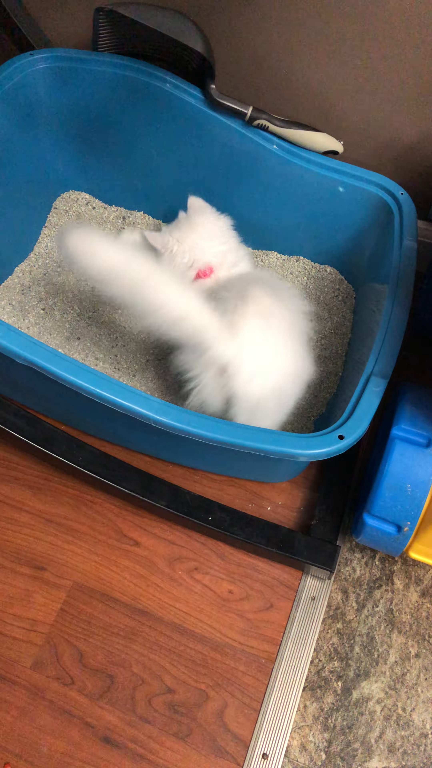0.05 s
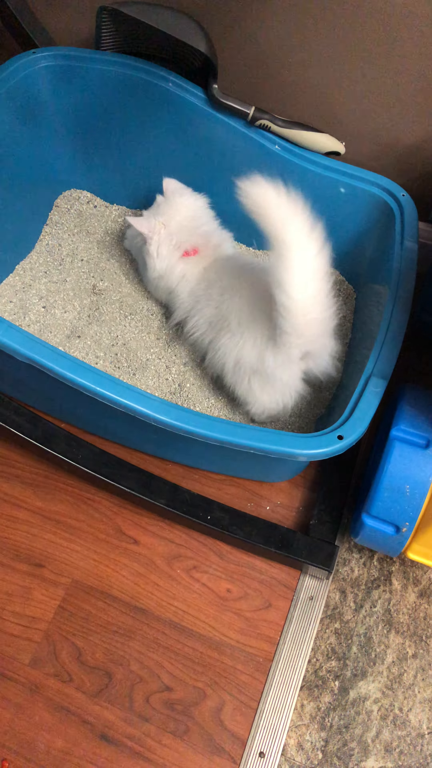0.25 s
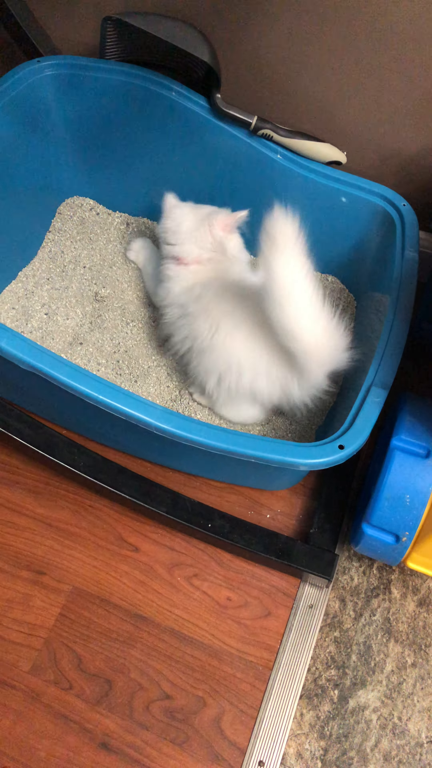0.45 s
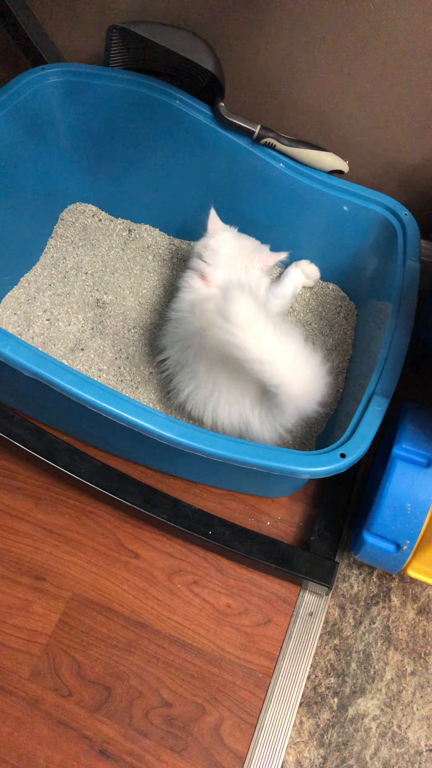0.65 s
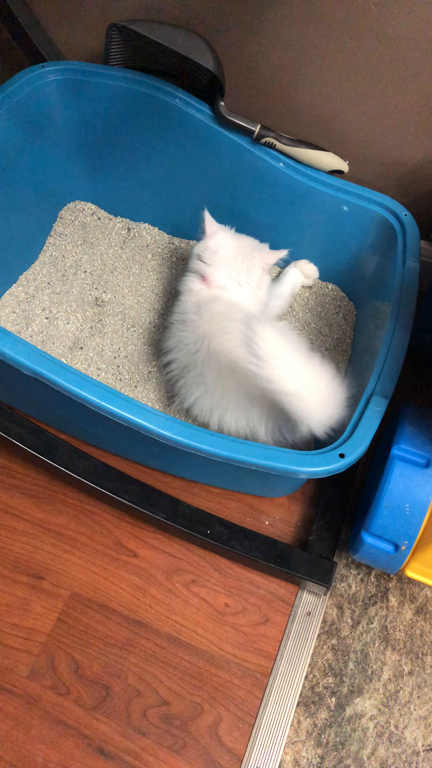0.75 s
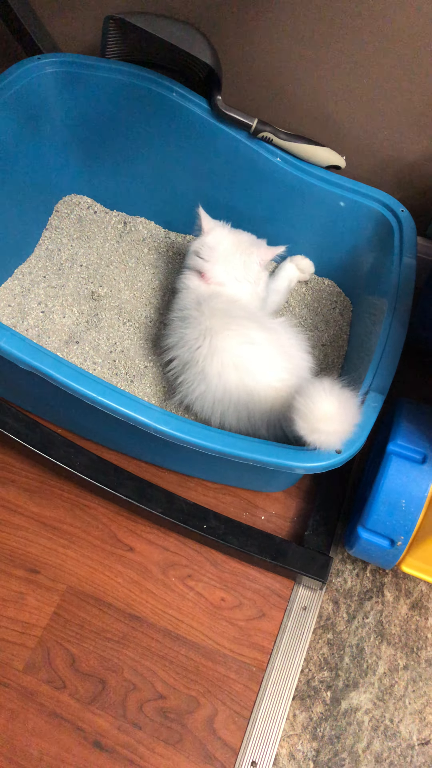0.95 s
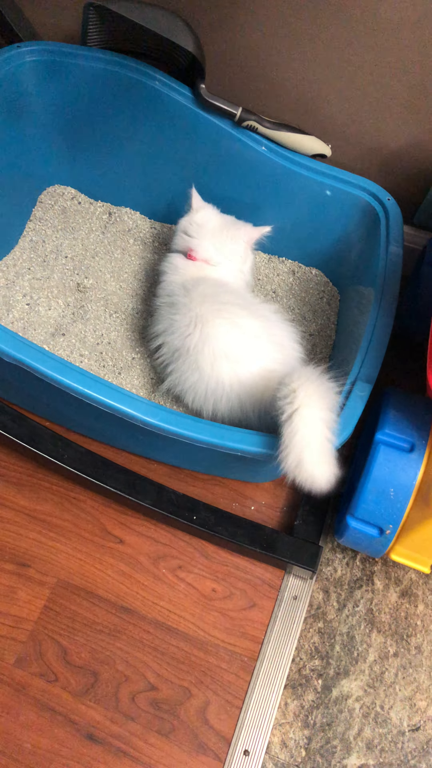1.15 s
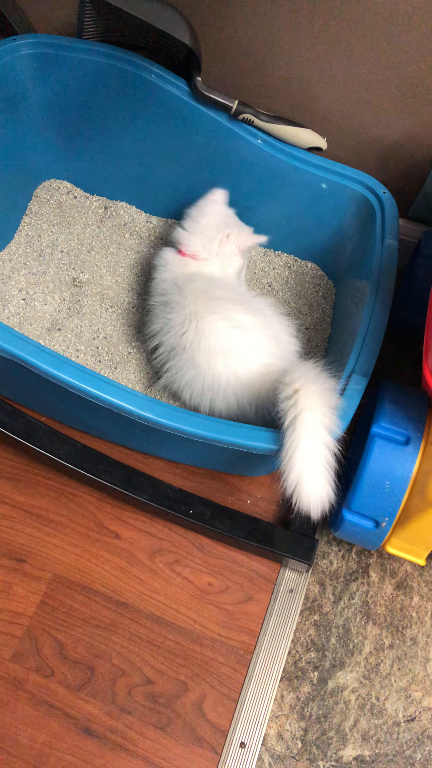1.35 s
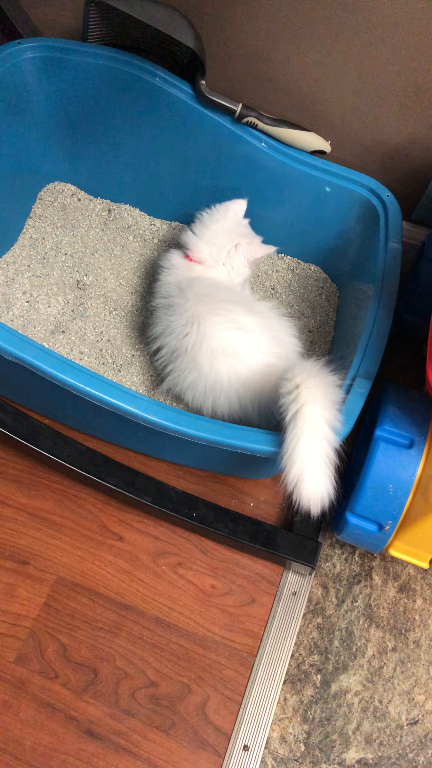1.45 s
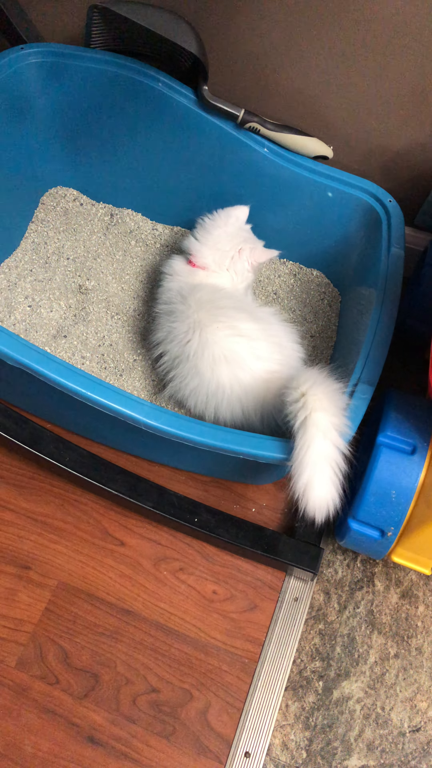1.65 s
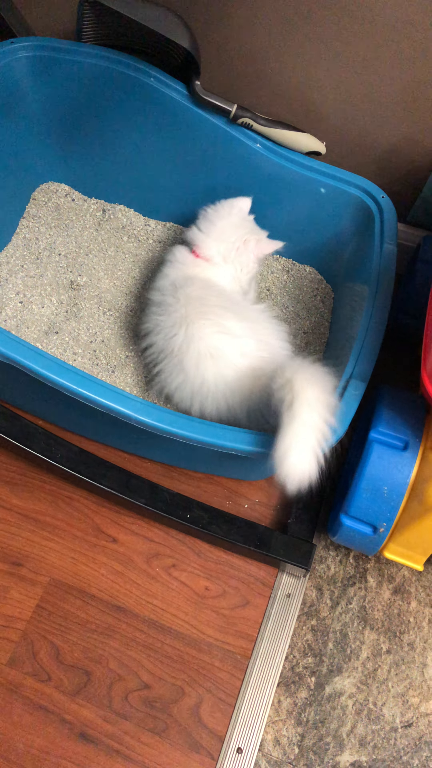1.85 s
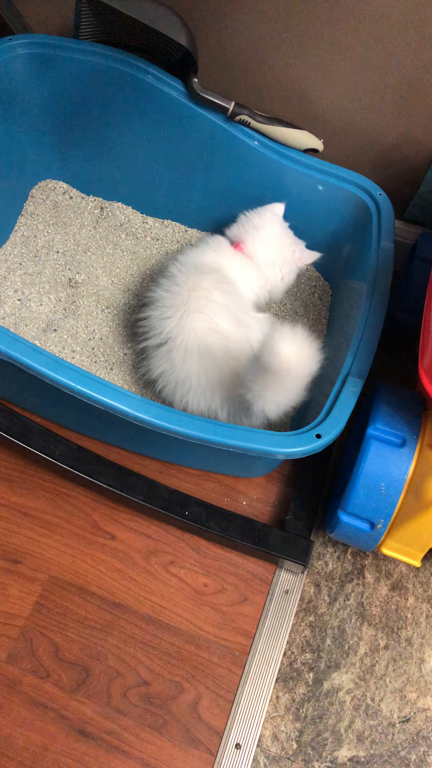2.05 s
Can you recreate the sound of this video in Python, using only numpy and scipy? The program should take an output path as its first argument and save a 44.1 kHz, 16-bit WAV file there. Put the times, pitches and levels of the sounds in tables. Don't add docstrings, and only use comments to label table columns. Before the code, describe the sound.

A kitten scrambles in a plastic litter tray, heard very close in a small quiet room. After a soft scrape, granules spray and clatter brightly from 0.2 to 0.4 seconds. A duller drag leads to a second hollow, rattling burst at 0.6 to 0.7. Then faint grit and fur rustle, with soft bumps near 0.85, 1.7 and 2.03, a light tap at 1.13, and low appliance hum.

```python
import sys
import numpy as np
from scipy import signal
from scipy.fft import rfft, irfft
from scipy.io import wavfile
from scipy.ndimage import uniform_filter1d

SR = 44100
rng = np.random.default_rng(int(sys.argv[2]) if len(sys.argv) > 2 else 0)


def gain_from_db(level_db):
    decades = np.asarray(level_db, float) / 20
    return 10 ** decades


def store_wav(level_fs):
    pcm = np.round(np.clip(np.atleast_2d(level_fs), -1, 1) * 32767)
    wavfile.write(sys.argv[1], SR, pcm.T.astype(np.int16))


N = 92610

# pitch_hz, level_db (per Hz)
ROOM_NOISE = [(15, -104), (25, -1.5), (114, -4.5), (229, -5.5), (335, -4.5), (863, -17), (3340, -31),
              (4370, -30.5), (16000, -49.5)]
# pitch_hz, level_db, waver_hz
HUM = [
    (57.2, -62, 7.3),
    (120.74, -57, 4.3),
    (184.3, -63.5, 2.9),
    (324.2, -62.5, 20.2),
    (437, -78, 25),
]
# start_s, length_s, level_db, pitch_hz
THUDS = [
    (0.823, 0.053, -52, 223),
    (0.856, 0.05, -49, 81),
    (1.668, 0.24, -53, 72),
    (1.68, 0.058, -47, 108.7),
    (2.031, 0.065, -52, 62),
]
# start_s, length_s, level_db, pitch_hz,
# width_hz
CHIMES = [(0.311, 0.0068, -46, 1100, 400), (.33, 0.0024, -42.5, 1320, 400), (0.221, 0.015, -44, 3280, 600),
          (.597, 0.038, -52, 544, 249), (.598, 0.048, -54, 764, 90), (0.656, 0.035, -51, 725, 80),
          (.711, .017, -55, 13900, 80), (0.714, 0.011, -63, 9500, 100), (0.728, .025, -63, 13800, 80),
          (.745, 0.011, -63, 8700, 198), (0.885, 0.064, -59.5, 820, 610), (1.069, 0.12, -63, 935, 685),
          (1.125, 0.057, -70, 3950, 610), (1.155, 0.035, -71.5, 13850, 250),
          (1.187, 0.026, -72, 8250, 1500), (1.166, 0.19, -74.5, 5200, 700), (1.2, 0.013, -64.5, 13900, 900),
          (1.217, 0.067, -64.5, 4350, 800), (1.32, 0.051, -63, 5060, 600), (1.346, 0.13, -68.5, 4900, 800),
          (1.229, 0.051, -65, 4140, 220), (2.0315, 0.008, -65, 14000, 300)]
# peak_s, level_db, pitch_hz, ring_ms
TICKS = [(.1967, -45, 2220, .5), (0.204, -43, 13500, .3), (.2154, -36, 6950, .3), (.2173, -36, 9000, .2),
         (.205, -37, 4700, .2), (.3455, -36, 3600, .5), (0.6128, -44, 3500, 0.43), (0.2218, -33, 8100, .3),
         (0.2256, -33, 7250, 0.24), (.227, -30, 14800, .3), (0.229, -30, 7850, 0.28),
         (.231, -33, 3240, 0.44), (0.234, -34, 7600, 0.38), (0.2404, -30, 10400, 0.16),
         (.2419, -31, 6600, 0.22), (.2595, -35, 8900, .3), (0.2628, -35, 9200, .3),
         (0.2664, -34, 8300, 0.17), (.3005, -42, 5800, 0.34), (0.3039, -37, 3700, 0.3),
         (0.314, -37, 14200, 0.22), (0.3184, -36, 7200, 0.25), (.323, -39, 6930, .3),
         (.3308, -36, 8800, .3), (0.3316, -39, 1430, 0.69), (0.3485, -41, 3830, 0.59),
         (.3628, -34.5, 5440, 0.26), (0.3791, -43.5, 3200, 0.23), (0.3824, -45, 3000, 0.28),
         (.566, -44, 4230, 0.28), (0.5866, -47, 3800, .4), (0.5952, -30, 1500, 0.31),
         (0.595, -24.5, 4570, 0.31), (0.598, -46, 4280, 0.27), (.5992, -32, 1620, 0.35),
         (.6182, -34, 12000, .3), (0.6191, -34, 3350, 0.2), (.6311, -40, 6500, 0.39), (.64, -43, 7500, 0.2),
         (0.642, -44, 5560, 0.19), (0.6565, -36, 5960, 0.32), (0.661, -45, 4170, 0.49),
         (.6669, -33, 4130, 0.26), (0.6692, -37.5, 1410, 0.47), (1.1285, -59.5, 7230, .8),
         (1.1286, -59, 8500, 0.63), (1.181, -61, 8600, .8), (2.034, -49, 1480, .6),
         (2.038, -51, 1670, 0.55)]
# start_s, level_db, ring_hz, boom_db, treble_db
CLUMPS = [(0.2042, -30, 4030, -18, -17), (0.225, -23, 7600, -40, -18), (0.2622, -25.5, 7500, -27, -17.5),
          (0.3079, -21.5, 8200, -32, -19.5), (0.3296, -24.5, 4170, -27, -20),
          (0.3439, -25.5, 3870, -43, -16), (0.3618, -27, 5400, -40, -18.5), (0.3775, -39, 2860, -34, -14),
          (0.5938, -25.5, 4800, -18, -19), (0.616, -26.5, 4100, -16, -22),
          (0.6658, -26.5, 2740, -22, -19.5), (0.7324, -40.5, 4280, -34, -20)]
# start_s, level_db, ring_hz, boom_db, treble_db
PATTERS = [(0.3164, -31.5, 3900, -22.5, -18), (0.365, -28.5, 8700, -27, -18), (0.598, -29, 5840, -15, -25),
           (0.6305, -29.5, 4200, -30, -19), (0.6557, -29.5, 4330, -37, -19), (0.702, -40.5, 2700, -24, -27),
           (0.7554, -41.5, 4250, -20.5, -20), (0.7857, -49.5, 4400, -14.5, -22),
           (0.8203, -51, 3900, -12, -24), (0.887, -56, 3940, -24, -42), (1.129, -52.5, 3780, -11, -19),
           (1.3294, -63, 5260, -44, -50), (2.0316, -47.5, 3400, -13, -34)]
# pitch_hz, level_db (per Hz)
CRACK_TONE = [(700, -22.5), (1500, 1.5), (3500, 2), (7500, 2), (10000, 6), (16000, 8)]
# pitch_hz, width_hz, level_db
WALL = [
    (400, 800, -11.5),
    (690, 140, -4),
    (1100, 93, -4.5),
    (1334, 240, 2.5),
    (1737, 240, -2.5),
]
# start_s, length_s, level_db, brightness (0-1)
DRAGS = [(0.069, 0.078, -55.5, 0), (0.132, 0.09, -52.5, 0.2), (0.199, 0.021, -46.5, 0.73),
         (0.213, 0.013, -40.5, 0.85), (0.22, 0.017, -39, 0.9), (0.231, 0.019, -42.5, 0.8),
         (0.244, .015, -46, 0.96), (.206, 0.0092, -51, 0.95), (0.584, 0.028, -65, 1),
         (0.254, 0.011, -45.5, 0.62), (0.262, 0.043, -54, 0.9), (0.298, 0.026, -53, 0.93),
         (0.341, 0.054, -57.5, 0.95), (0.393, 0.097, -65.5, 0.1), (0.463, 0.16, -49.5, 0.03),
         (0.607, 0.083, -58, 0), (0.649, 0.09, -57, 0.1), (0.694, 0.087, -61.5, 0.4),
         (0.76, 0.12, -67.5, 0.34), (0.86, 0.17, -73, 0), (0.959, 0.19, -72, 0.6), (1.076, 0.3, -67, 0.1),
         (1.293, 0.096, -69, 0), (1.431, 0.19, -72, 0.64), (1.631, 0.15, -67.5, 0.79),
         (1.773, 0.21, -69, 0.64), (1.894, 0.26, -63.5, 0.5)]
# pitch_hz, level_db (per Hz)
DEEP_TONE = [(180, -20), (300, -16.5), (574, -17.5), (774, -1.5), (915, -9), (1360, -4), (2700, -7),
             (16000, -26)]
# pitch_hz, level_db (per Hz)
THROWN_TONE = [(180, -2), (300, 2), (856, -1), (1410, -5.5), (1560, -19), (3350, 1.5), (4910, -1),
               (14700, -13.5), (16000, -27)]


def evened(x):
    return x / np.sqrt(np.mean(x ** 2) + 1e-20)


def add(mix, start_s, sound):
    part = mix[round(start_s * SR):][:len(sound)]
    part += sound[:len(part)]


def colour(x, tone):
    hz, db = np.transpose(tone)
    bins = np.fft.rfftfreq(2048, 1 / SR)
    log_gain = np.log(gain_from_db(np.interp(np.log(bins + 1), np.log(hz), db)))
    cepstrum = irfft(log_gain)
    cepstrum[1:1024] *= 2
    cepstrum[1025:] = 0
    taps = irfft(np.exp(rfft(cepstrum)))
    return signal.oaconvolve(x, taps / np.linalg.norm(taps))[:len(x)]


def resonate(x, hz, width_hz):
    turn = np.exp(2j * np.pi * hz * np.arange(len(x)) / SR)
    decay = np.exp(-np.pi * width_hz / SR)
    return 2 * (turn * signal.lfilter([1 - decay], [1, -decay], x / turn)).real


def arch(length_s, peak=1., sharp=1.):
    return np.sin(np.pi * np.linspace(0, 1, round(length_s * SR)) ** peak).clip(0) ** sharp


def room_noise():
    hz, db = np.transpose(ROOM_NOISE)
    bins = np.fft.rfftfreq(N, 1 / SR)
    gain = gain_from_db(np.interp(np.log(bins + 1), np.log(hz), db, left=-60))
    return gain_from_db(-55.5) * evened(irfft(rfft(rng.standard_normal(N)) * gain, N))


def appliance_hum():
    out, t = np.zeros(N), np.arange(N) / SR
    for hz, db, waver_hz in HUM:
        noise = rng.standard_normal(2 * N)
        fuzz = evened(resonate(resonate(noise, hz, waver_hz), hz, waver_hz)[N:])
        steady = 0.9 * min(5 / waver_hz, 1)
        tone = np.sqrt(2 * steady) * np.sin(2 * np.pi * hz * t)
        out += gain_from_db(db) * (tone + np.sqrt(1 - steady) * fuzz)
    return out


def reflections(x):
    level_db, fade_60db_s = -12.5, 0.3
    taps = np.zeros(SR // 2)
    slots = np.arange(200, SR // 2 - 20, 20)
    signs = rng.choice([-1., 1.], len(slots))
    taps[slots + rng.integers(0, 20, len(slots))] = signs * gain_from_db(-60 * slots / SR / fade_60db_s)
    return gain_from_db(level_db) * signal.fftconvolve(x, taps / np.linalg.norm(taps))[:N]


def floor_thuds():
    out = np.zeros(N)
    for start_s, length_s, db, hz in THUDS:
        swell = arch(length_s, peak=0.78)
        add(out, start_s, gain_from_db(db) * swell * np.sin(2 * np.pi * hz * np.arange(len(swell)) / SR))
    return out


def chimes():
    out, flutter_db = np.zeros(N), 2
    for start_s, length_s, db, hz, width_hz in CHIMES:
        noise, luck = rng.standard_normal((2, 14000))
        noise = noise * gain_from_db(flutter_db * evened(uniform_filter1d(luck, size=200)))
        tone = resonate(resonate(noise, hz, width_hz), hz, 3 * width_hz)[2000:]
        swell = arch(length_s, peak=0.45, sharp=0.48)
        add(out, start_s, gain_from_db(db) * swell * evened(tone[:len(swell)]))
    return out


def granule_ticks():
    level_db, click_db = 1.5, 3.5
    out, t = np.zeros(N), np.arange(400) / SR
    click = signal.lfilter(*signal.butter(2, 1500, "high", fs=SR), t == 0)
    for peak_s, db, hz, ring_ms in TICKS:
        rise_s = 0.68 * ring_ms / 1000
        u = t / rise_s
        ring = u * np.exp(1 - u) * np.sin(2 * np.pi * hz * t)
        snap = gain_from_db(click_db) * np.roll(click, round(rise_s * SR))
        add(out, peak_s - rise_s, gain_from_db(db + level_db) * (ring + snap))
    return out


def wall_hits(table, rise_s):
    level_db, spiky_db, treble_lift_db, lag_s = -10.5, 2.0, 11.5, 0.0006
    ring_db, ring_width_hz, boom_lift_db = -12, 1320, 14
    after_db, after_s = -10, 0.02
    out, t = np.zeros(N), np.arange(2600) / SR
    u = t / rise_s
    shape = u * np.exp(1 - u) + gain_from_db(after_db) * np.minimum(u, 1) * np.exp(-t / after_s)
    power = np.linalg.norm(shape)
    low_pass = signal.butter(5, 8500, fs=SR)
    for start_s, db, hz, boom_db, treble_db in table:
        noise, luck = rng.standard_normal((2, 2600))
        spikes = gain_from_db(spiky_db * evened(uniform_filter1d(luck, size=12)))
        burst = shape * evened(noise * spikes)
        crack = colour(burst, CRACK_TONE)
        dull = signal.filtfilt(*low_pass, crack)
        crack = dull + gain_from_db(treble_db + treble_lift_db) * (crack - dull)
        ring = resonate(resonate(burst, hz, ring_width_hz), hz, ring_width_hz)
        boom = np.zeros(len(t))
        for wall_hz, width_hz, wall_db in WALL:
            mode = resonate(resonate(burst, wall_hz, width_hz), wall_hz, 3 * width_hz)
            boom += gain_from_db(wall_db) * np.sqrt(SR / width_hz / np.pi) * mode
        for part_db, part in [(0, crack), (ring_db, ring), (boom_db + boom_lift_db, boom)]:
            gain = gain_from_db(db + level_db + part_db) * power / np.linalg.norm(part)
            add(out, start_s + lag_s, gain * part)
    return out


def grit():
    grains_per_s, spread_db, clump_db, grain_q = 16000, 3.5, 1.5, 2.4
    size = gain_from_db(spread_db * np.minimum(rng.exponential(1, N), 3)) * rng.choice([-1., 1.], N)
    drift = uniform_filter1d(rng.standard_normal(N), size=120)
    clump = evened(uniform_filter1d(drift, size=120))
    clicks = size * (rng.random(N) < grains_per_s / SR) * gain_from_db(clump_db * clump)
    pitches_hz = np.geomspace(1120, 15400, num=9)
    kind = rng.integers(0, len(pitches_hz) + 2, N)
    tuned = np.zeros(N)
    for k, hz in enumerate(pitches_hz):
        tuned += resonate(clicks * (kind == k), hz, hz / grain_q)
    return evened(clicks * (kind >= len(pitches_hz)) + 1.66 * tuned)


def paw_drags():
    dust_db, dust_low_hz = 10, 7700
    deep, thrown, dust = np.zeros((3, N))
    for start_s, length_s, db, bright in DRAGS:
        swell = gain_from_db(db) * arch(length_s, peak=0.85, sharp=1.39)
        add(deep, start_s, swell * np.sqrt(1 - bright))
        add(thrown, start_s, swell * np.sqrt(bright))
        add(dust, start_s, swell * bright ** 4)
    high_pass = signal.butter(2, dust_low_hz, "high", fs=SR)
    hiss = signal.lfilter(*high_pass, rng.standard_normal(N))
    granules = colour(deep * grit(), DEEP_TONE) + colour(thrown * grit(), THROWN_TONE)
    return granules + gain_from_db(dust_db) * dust * hiss


def scene():
    clumps = wall_hits(CLUMPS, rise_s=0.00074)
    patters = wall_hits(PATTERS, rise_s=0.0016)
    tray = chimes() + granule_ticks() + clumps + patters + paw_drags()
    background = room_noise() + appliance_hum() + floor_thuds()
    return (background + tray + reflections(tray))[None]


def top_cut(x):
    return signal.sosfilt(signal.butter(12, 16780, fs=SR, output="sos"), x)


def record(dry):
    start_s, fade_in_s = 0.0838, 0.0017
    settle_hz, settle_s = 162, 0.24
    low_hz, high_hz = 56.5, 15800
    since_s = np.arange(N) / SR - start_s
    bass = signal.sosfiltfilt(signal.butter(2, settle_hz, fs=SR, output="sos"), dry)
    x = dry - bass * np.exp(-np.maximum(since_s, 0) / settle_s)
    x = signal.sosfilt(signal.butter(4, low_hz, "high", fs=SR, output="sos"), x)
    taps = signal.firwin(255, high_hz, window=("kaiser", 7), fs=SR)
    x = signal.oaconvolve(x, taps[None], "same")
    return top_cut(x * np.clip(since_s / fade_in_s, 0, 1))


dry = scene()
out = record(dry)
store_wav(out)
```